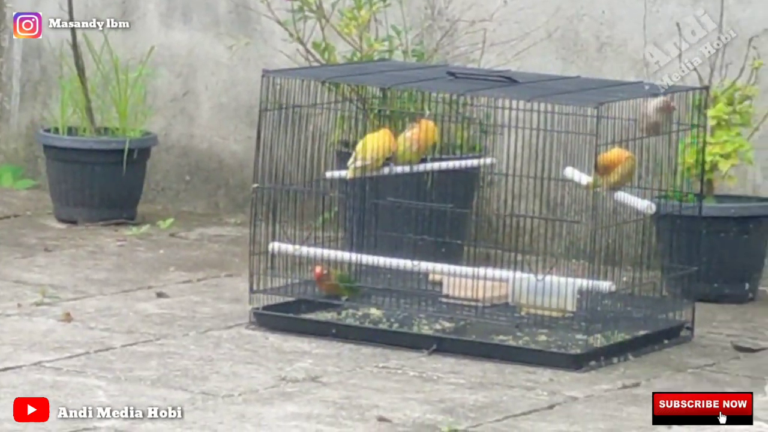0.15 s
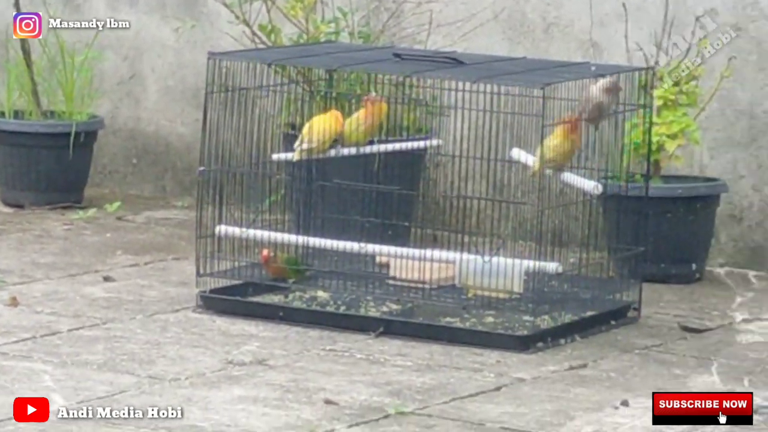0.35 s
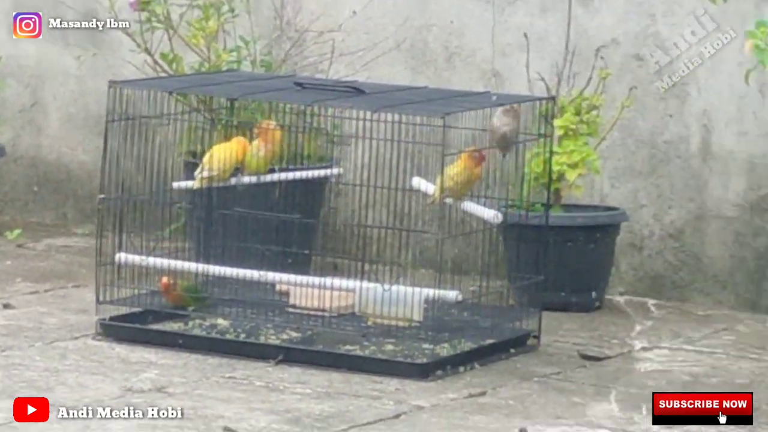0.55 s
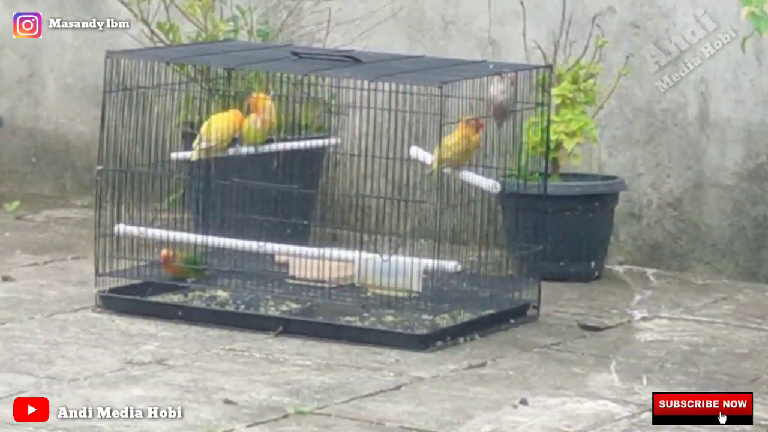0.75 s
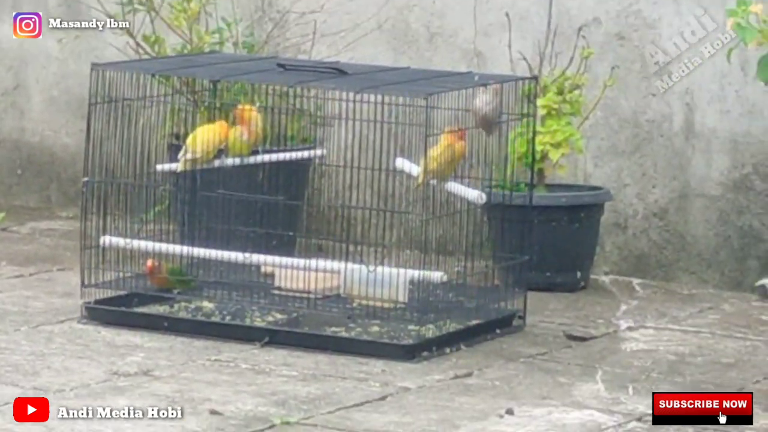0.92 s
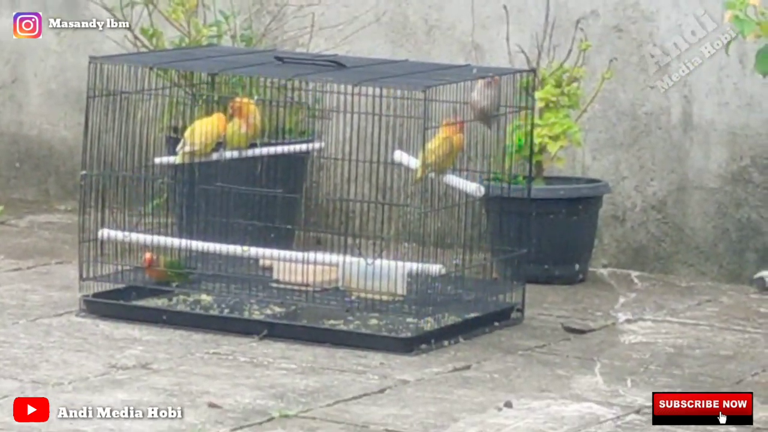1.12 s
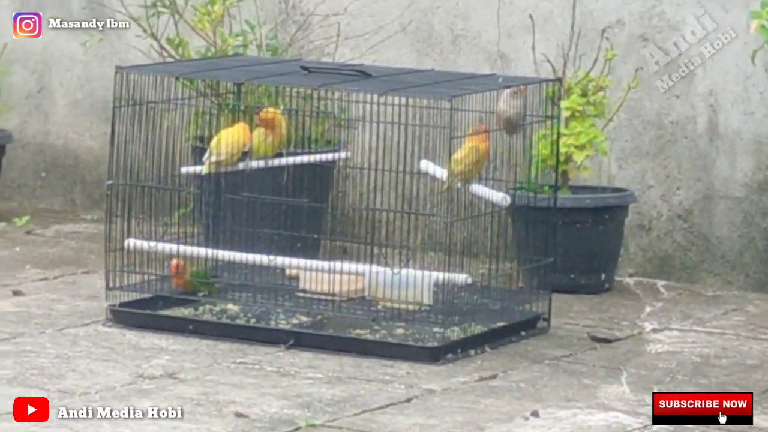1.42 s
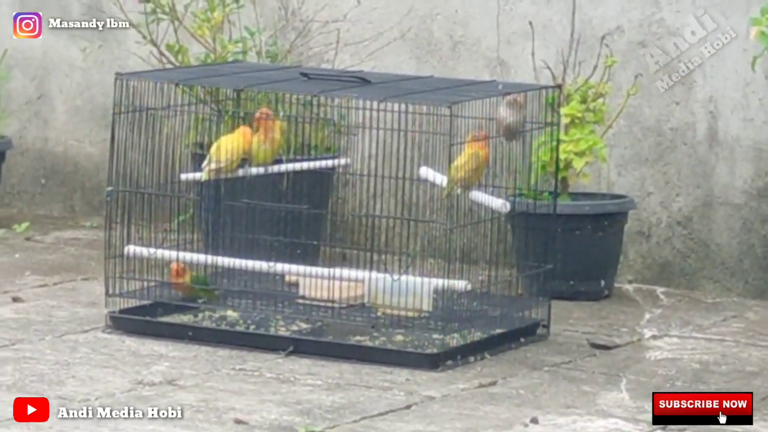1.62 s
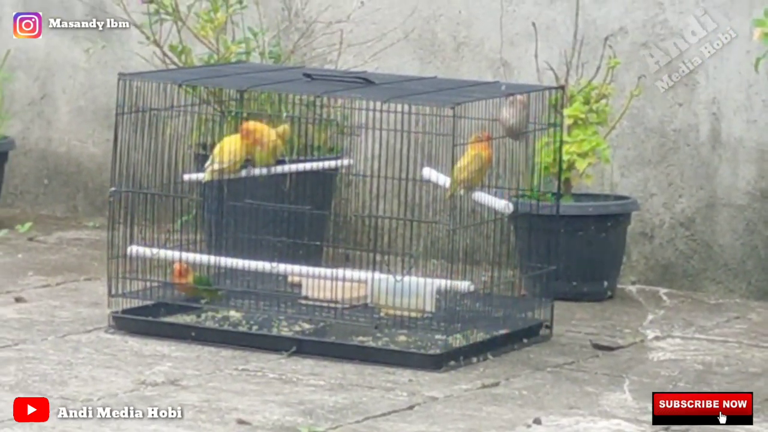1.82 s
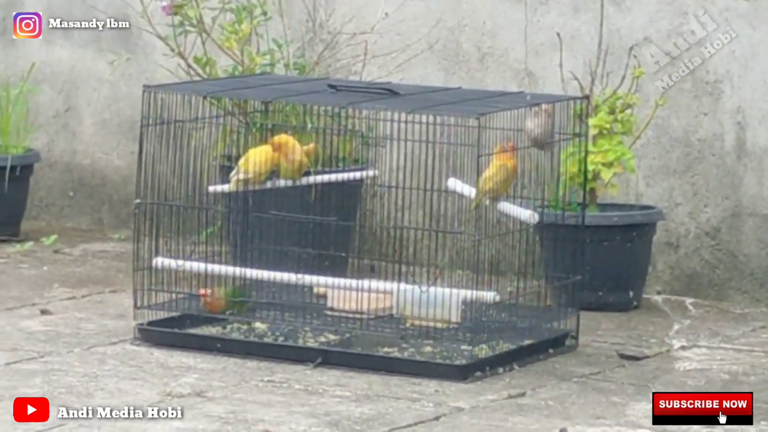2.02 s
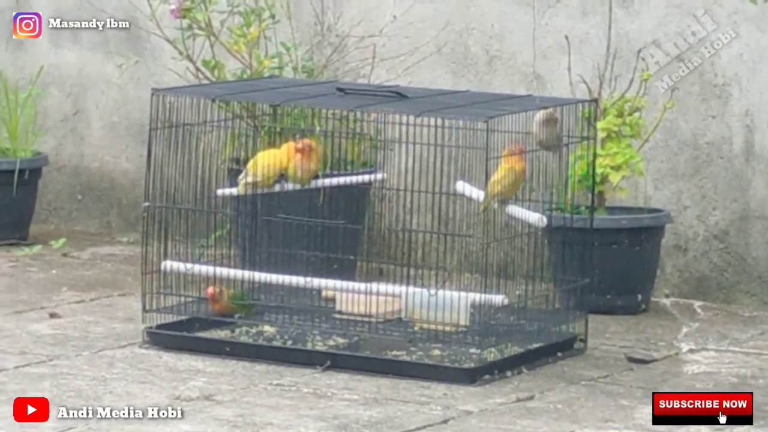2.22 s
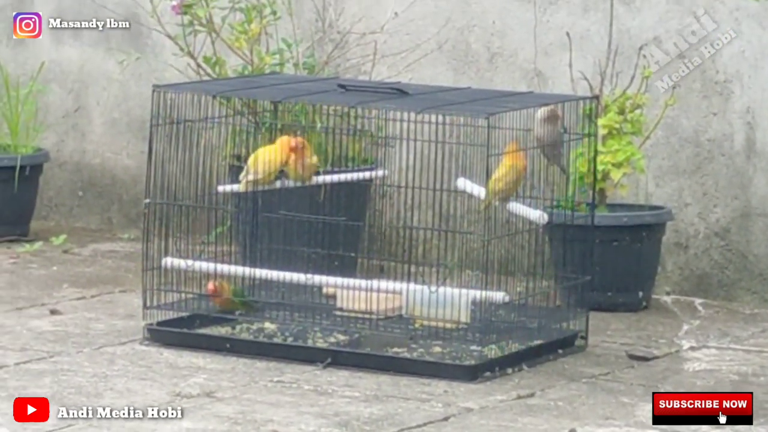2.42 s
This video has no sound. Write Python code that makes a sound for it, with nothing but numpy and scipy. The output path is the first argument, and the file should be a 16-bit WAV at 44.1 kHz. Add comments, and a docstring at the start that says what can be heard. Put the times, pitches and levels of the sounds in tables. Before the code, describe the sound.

Quick, shrill small-parrot twitter with short gliding notes, hollow plastic knocks early on, small ticks near the end, faint low outdoor rumble beneath, and hard yard walls adding short echoes around the microphone a few steps away.

```python
"""A walled, paved yard outdoors, with lovebirds twittering in a wire cage.
Runs of very short gliding calls, some pure, some raspy, are harmonics of one moving pitch plus pulsed hiss.
A hollow plastic perch rattles in decaying tube modes; beak and claw ticks are noise snaps with short rings.
Two faint whistles fall farther off. Delayed copies and decaying noise make the yard's echoes and ring.
Beneath lie a faint shaped-noise rumble, a wavering hum, a far drone and the tail of an earlier call."""
import sys
import numpy as np
from scipy import signal
from scipy.fft import rfft, irfft
from scipy.io import wavfile
from scipy.ndimage import map_coordinates

SR = 44100
rng = np.random.default_rng(int(sys.argv[2]) if len(sys.argv) > 2 else 0)


def master_out(mix):
    """Clip the mix to full scale and print it as 16-bit PCM to the path in sys.argv[1]."""
    frames = np.transpose(np.atleast_2d(mix))
    ceiling = np.clip(frames, -1, 1)
    pcm = np.round(ceiling * 32767).astype(np.int16)
    wavfile.write(sys.argv[1], SR, pcm)


N = 112454  # samples, about 2.55 s


def undb(db):
    """Decibels to amplitude gain."""
    return 10 ** (np.asarray(db) / 20)


def unit(x):
    """Scale to rms 1."""
    return x / np.sqrt(np.mean(x ** 2) + 1e-20)


def noise(points, size):
    """Noise of rms 1, its spectrum drawn through (hz, db) points on a log frequency axis."""
    hz, db = np.array(points, float).T
    f = np.maximum(np.arange(size // 2 + 1) * SR / size, 1)
    gain = undb(np.interp(np.log(f), np.log(hz), db))
    return unit(irfft(rfft(rng.standard_normal(size)) * gain, size))


def wobble(hz, size):
    """Smooth random motion: a curve through hz random points a second."""
    at = np.arange(size) * hz / SR
    return map_coordinates(rng.standard_normal(512), [at], order=2, mode="wrap")


def add(out, start, x):
    """Mix x into out at a time in seconds."""
    i = max(int(start * SR), 0)
    out[i:i + len(x)] += x[:max(len(out) - i, 0)]


def fade(t, t60):
    """Exponential decay that falls 60 dB in t60 seconds."""
    return np.exp(-np.log(1000) * t / t60)


def outdoor_air():
    """Faint outdoor rumble: shaped noise whose level wanders slowly."""
    # spectrum of the open air: hz, relative_db
    air_colour = [(20, -10.5), (65, 1.5), (115, -4.5), (200, -2), (290, -20), (1000, -17), (3000, -22),
                  (16000, -41)]
    level_db = -51 + wobble(4, N)
    return undb(level_db) * noise(air_colour, N)


def low_hum(t):
    """Steady 64 Hz sine with a wavering level."""
    level_db = -56 + 2.5 * wobble(5.43, N)
    return undb(level_db) * np.sqrt(2) * np.sin(2 * np.pi * 64 * t)


def far_drone(t):
    """Distant drone: noise gathered in low bands, fading and then returning."""
    # bands of the drone: hz, relative_db
    drone_colour = [(110, -3), (172, 0), (250, -11.5), (370, -4.5), (520, -33)]
    # its fall and return: time_s, level_db
    drone_level = [(0, -48.5), (.9, -56), (1.7, -57.5), (2.1, -62.5), (2.5, -53)]
    level_db = np.interp(t, *np.array(drone_level).T)
    return undb(level_db) * noise(drone_colour + [(2000, -76)], N)


def earlier_call(t):
    """Ring left by an earlier call: noise in the call's bands, dying away from the start."""
    # spectrum of that ring: hz, relative_db
    call_colour = [(1180, -37), (3320, -13), (4130, -2), (5190, -5.5), (5410, -38), (8240, -23),
                   (15000, -28)]
    return undb(-36) * noise(call_colour, N) * fade(t, 0.52)


def soft_bump(t):
    """One soft low bump: a narrow band of noise under a bell-shaped swell."""
    # the bump: centre_s, width_s, centre_hz, level_db
    when, width, hz, db = (2.54, .025, 270, -47)
    swell = np.exp(-((t - when) / width) ** 2)
    band = [(hz / 4, -25), (hz, 0), (hz * 2, -25), (hz * 10, -60)]
    return undb(db) * swell * noise(band, N)


def background():
    """Everything that lies behind the birds and the cage, summed without added echo."""
    t = np.arange(N) / SR
    return outdoor_air() + low_hum(t) + far_drone(t) + earlier_call(t) + soft_bump(t)


def yard(x):
    """Direct sound, echoes off paving and walls, quick scatter and a longer coloured ring."""
    # reflections from nearby surfaces: delay_s, level_db
    echo_paths = [(0.0109, -31), (0.0268, -14.5)]
    # colour of the yard's ring: hz, relative_db
    ring_colour = [(200, -19.5), (1500, -2), (3000, 3.5), (4800, -4.5), (6500, -4.5), (10000, -4.5),
                   (16000, -7.5)]
    scatter_db, scatter_t60 = -4, 0.19  # dB re direct energy, s
    ring_db, ring_t60 = -12.5206, 0.55
    t = np.arange(32768) / SR
    # both tails build up over a few milliseconds before they decay
    scatter = rng.standard_normal(len(t)) * fade(t, scatter_t60) * np.clip(t / 0.0087, 0, 1)
    ring = noise(ring_colour, len(t)) * fade(t, ring_t60) * np.clip(t / 0.024, 0, 1)
    response = undb(scatter_db) * scatter / np.linalg.norm(scatter)
    response += undb(ring_db) * ring / np.linalg.norm(ring)
    response[0] += 1  # direct sound
    for delay, db in echo_paths:
        add(response, delay, undb([db]))
    return signal.fftconvolve(x, response)[:N]


def far_bird():
    """Thin falling whistles farther off: sines that swell and fade."""
    # the whistles: start_s, length_s, start_hz, end_hz, level_db (the crest is 6 dB higher)
    whistles = [(2.296, 0.064, 3240, 2930, -58), (2.483, 0.0276, 3110, 2820, -54.5)]
    out = np.zeros(N)
    for start, length, first, last, db in whistles:
        size = int(length * SR)
        phase = 2 * np.pi * np.cumsum(np.linspace(first, last, size)) / SR
        add(out, start, 2 * undb(db) * np.hanning(size) * np.sin(phase))
    return out


def perch():
    """Each knock rings the hollow tube's modes; the place of the knock sets their weights."""
    # knocks as a bird shifts: start_s, level_db before trim_db
    knocks = [(.017, -24.5), (.045, -26), (0.063, -34.5), (0.092, -27), (0.219, -26), (0.27, -32),
              (0.301, -26.5), (0.331, -28), (0.359, -23.5), (0.397, -28.5), (0.451, -28), (0.468, -30),
              (1.630, -32), (1.651, -33.5), (1.985, -35)]
    # tube modes 1, 2, 3: hz before the pitch factor, relative_db, t60_s
    tube_modes = [(628, -4.5, 0.033), (1105, -9, 0.024), (1565, -11, 0.023)]
    # where the perch is knocked: time_s, place along the tube 0-1, pitch_factor
    grip = [(0.108, 0.304, 0.87), (0.215, 0.358, 0.85), (0.3, 0.498, 0.93)]
    trim_db, crack_db = -0.5, -11  # crack relative to the ring
    crack_colour = [(100, 8.5), (400, 12), (1400, -10.5), (3000, -41)]  # hz, relative_db
    out, t = np.zeros(N), np.arange(4096) / SR
    times, places, factors = np.array(grip).T
    for start, db in knocks:
        place = np.interp(start, times, places)
        factor = np.interp(start, times, factors)
        ring = 0
        for k, (hz, mode_db, t60) in enumerate(tube_modes, 1):
            hz = hz * factor * (1 + 0.015 * rng.standard_normal())
            weight = np.sin(k * np.pi * place) * undb(mode_db)
            ring = ring + weight * fade(t, t60) * np.sin(2 * np.pi * hz * t)
        crack = noise(crack_colour, len(t)) * fade(t, 0.033)
        add(out, start, undb(db + trim_db) * (ring + undb(crack_db) * crack))
    return out


def ticks():
    """Small ticks on the cage, as of beak or claw: a bright snap and a very short ring of two modes."""
    # the ticks: start_s, level_db before trim_db, ring_hz, snap_db relative to the ring
    cage_ticks = [(2.197, -35, 1240, -16), (2.365, -36.5, 1290, 2), (2.3757, -26.5, 1794, 0.5),
                  (2.407, -30, 1136, -1.5), (2.429, -39, 1246, -4)]
    trim_db, ring_t60, snap_t60 = 0.5, 0.017, 0.02  # dB, s, s
    snap_colour = [(200, -8.5), (1500, 8.5), (4000, -7.0), (15000, -5.5)]  # hz, relative_db
    out, t = np.zeros(N), np.arange(4096) / SR
    for start, db, hz, snap_db in cage_ticks:
        modes = np.sin(2 * np.pi * hz * t) + np.sin(2 * np.pi * hz * 1.5 * t) / 2
        ring = modes * fade(t, ring_t60)
        snap = noise(snap_colour, len(t)) * fade(t, snap_t60)
        add(out, start, undb(db + trim_db) * (ring + undb(snap_db) * snap))
    return out


def note(length, pitches, levels, rough):
    """One syrinx note: an arched glide with harmonics; roughness shakes pitch, chops level and adds hiss."""
    # colour of the hiss in rough notes: hz, relative_db
    rasp_colour = [(1500, -26.5), (2100, -21), (3000, 11), (4500, 3.5), (6300, 2), (7500, 12.5), (10000, 4),
                   (13000, 4), (16000, -18.5)]
    attack, release = 0.0021, 0.0026  # s
    jitter_hz, jitter, shimmer = 613.5, 0.066, 0.49  # random points a second; shares at full roughness
    trill_hz, trill_depth, flutter = 253.4, 0.07, 0.73  # rate varies by note; shares as above
    overtone_fall_db = -9  # per harmonic above the fourth
    rasp_db, rasp_arch = -4.5, 0.84  # arch: share of the hiss that swells toward mid-note
    swell_db = 2.5  # growth from start to end
    size = 4096
    t = np.arange(size) / SR - attack / 2
    along = np.clip(t / length, 0, 1)  # progress through the note

    hz = np.polyval(np.polyfit([0, .5, 1], pitches, 2), along)
    trill = np.sin(2 * np.pi * (trill_hz * t * rng.uniform(0.88, 1.175) + rng.random()))
    hz = hz * (1 + rough * (jitter * wobble(jitter_hz, size) + trill_depth * trill))
    phase = 2 * np.pi * np.cumsum(hz) / SR

    gains = undb(np.r_[levels, levels[-1] + overtone_fall_db * np.arange(1, 4)])
    tone = 0
    for k, gain in enumerate(gains, 1):
        below_limit = k * hz < SR / 2
        tone = tone + gain * np.sqrt(2) * np.sin(k * phase) * below_limit
    tone = tone * (1 + shimmer * rough * wobble(jitter_hz, size))

    # the hiss comes in one puff per cycle of the pitch
    hiss = noise(rasp_colour, size) * (1 + np.cos(phase))
    hiss = hiss * rough * undb(rasp_db) * np.linalg.norm(gains)
    hiss = hiss * (1 - rasp_arch + rasp_arch * np.sin(np.pi * along))

    env = np.clip(t / attack + .5, 0, 1) * np.clip((length - t) / release + .5, 0, 1)
    env = env * undb(swell_db * (along - .5))
    env = env * (1 + flutter * rough * trill)
    return env * (tone + hiss)


def lovebirds():
    """The twitter, high-passed to keep the quick note onsets free of low clicks."""
    # the notes of the twitter, and at 1.591 s a high echo of the call before it:
    # start_s, length_s, start_hz, middle_hz, end_hz,
    # harmonic_1_db to harmonic_4_db before voice_db, roughness (held to 0-1)
    twitter = [ (.184, 0.016, 3380, 3293, 3600, -28, -28, -46.5, -43.5, 0.14),
               (.199, .008, 3570, 4580, 5500, -21, -34, -32, -60.5, 0.1),
               (0.206, 0.0083, 6030, 5680, 4400, -20, -42, -58, -61, 0.06),
               (0.212, .024, 3485, 3320, 3265, -26, -23, -36.5, -27.5, 0.41),
               (.239, 0.046, 3266, 3110, 3043, -28, -24.5, -35, -31.5, 0.11),
               (0.293, 0.0054, 5890, 4550, 4200, -20, -31, -36, -62, 0.7),
               (0.296, .011, 4420, 4467, 4600, -19, -36, -28.5, -62, 0.42),
               (0.307, .024, 4686, 4780, 4630, -32, -41.5, -37, -62, 0.81),
               (0.331, 0.013, 4374, 4360, 4420, -17, -34, -31, -57, 0.11),
               (.542, .026, 6950, 4940, 5100, -33, -45, -34.5, -64, 0.29),
               (.614, 0.018, 1910, 2213, 2120, -43, -40, -55, -65, 0.76),
               (0.679, 0.028, 1562, 1976, 2100, -45, -35, -62, -56, 0.44),
               (0.709, .013, 3130, 2896, 3200, -30, -44, -56, -42.5, 0.05),
               (0.706, 0.018, 4130, 4135, 4140, -30.5, -39, -43, -62, 0.46),
               (0.726, 0.016, 5170, 6380, 6010, -32.5, -34, -62, -62, 0.2),
               (0.736, 0.012, 5570, 5010, 5470, -28, -46, -45, -62, 0.29),
               (0.821, 0.016, 1700, 2120, 2280, -40.5, -50, -64, -56, 0.37),
               (.83, 0.044, 1672, 1992, 2055, -53, -30, -59, -40.5, 0.5),
               (0.867, 0.011, 3040, 3010, 3100, -27, -36, -56, -33.5, 0.19),
               (0.88, .018, 4610, 4870, 4780, -29.5, -55, -43, -62.5, 0.67),
               (0.928, 0.025, 2076, 2454, 2330, -33, -35.5, -42, -50, 0.15),
               (.949, 0.017, 2230, 2072, 2220, -33.5, -23.5, -47, -34, 0.09),
               (.967, 0.0086, 2960, 3400, 3370, -20, -42.5, -46, -36, 0.63),
               (0.974, .034, 3086, 2965, 2930, -28, -29.5, -47.5, -25.5, .12),
               (1.014, 0.017, 3060, 2940, 2730, -45, -26.5, -46.5, -29.5, 0.33),
               (1.031, 0.022, 2960, 2917, 2760, -33.5, -39.5, -49.5, -34.5, 0.22),
               (1.024, .032, 5310, 5220, 4990, -29.5, -53.5, -58, -62.5, 0.3),
               (1.059, 0.0046, 3900, 4520, 4900, -27, -54, -46.5, -65, 0.43),
               (1.068, 0.012, 2330, 2303, 2480, -28, -38.5, -42, -58, 0.3),
               (1.075, 0.027, 3640, 3507, 3633, -14.5, -44.5, -38, -46, 0.02),
               (1.099, 0.011, 3680, 3844, 3770, -17.5, -37.5, -28, -39, 0.14),
               (1.116, 0.016, 4300, 4447, 4510, -18, -48.5, -41, -65, 0.39),
               (1.139, 0.0056, 4436, 5530, 7000, -21, -41.5, -60.5, -63.5, 0.77),
               (1.145, 0.0188, 6650, 6600, 6330, -26.5, -34.5, -62.5, -62.5, 1.05),
               (1.134, 0.054, 3120, 2848, 2537, -30, -40, -40, -37, .6),
               (1.162, 0.037, 4870, 4366, 5314, -15.5, -33, -28, -62, 0.15),
               (1.204, 0.029, 5000, 6360, 5630, -20.5, -33, -61, -60, 0.33),
               (1.191, .052, 2245, 2140, 2138, -34.5, -44, -40.5, -35.5, 0.39),
               (1.23, 0.017, 3100, 3183, 3100, -26.5, -42, -39, -44, 0.74),
               (1.25, 0.0088, 3520, 4385, 5700, -18.5, -27, -51, -65, 0.43),
               (1.259, .011, 3056, 3300, 3600, -25, -49, -36, -47, 0.52),
               (1.27, 0.018, 4765, 3655, 2930, -23, -41, -36.5, -57.5, 0.3),
               (1.293, 0.0064, 3250, 4100, 5140, -21, -26.5, -44.5, -60, 0.71),
               (1.318, .031, 5030, 5740, 6330, -27.5, -31, -62, -61, 0.24),
               (1.398, 0.0088, 1760, 2040, 2770, -36, -48, -52, -62, 0.05),
               (1.413, 0.022, 3570, 3415, 3080, -26.5, -39, -38, -58, 0.26),
               (1.432, 0.01, 3606, 3650, 3880, -21, -32, -33, -58.5, .35),
               (1.444, 0.0068, 2410, 2230, 2280, -30, -22, -37.5, -33, 0.52),
               (1.447, .012, 5250, 5490, 5850, -24, -28.5, -61.5, -64, 0.33),
               (1.565, 0.021, 5680, 6000, 6464, -15, -35, -62, -61, 0.18),
               (1.591, 0.016, 6150, 6400, 6470, -35.5, -27.5, -62, -62.5, 0.03),
               (1.649, 0.02, 2350, 2507, 2270, -28, -33.5, -41.5, -43, 0.15),
               (1.665, 0.022, 3680, 3620, 3380, -25, -39.5, -47, -53, .35),
               (1.696, 0.026, 4080, 4430, 4640, -21, -40, -39.5, -61.5, 0.6),
               (1.724, 0.0091, 4580, 5020, 4830, -13, -32, -50, -62, 0.1),
               (1.725, 0.023, 3040, 2940, 3040, -25.5, -36.5, -35, -36.5, 0.2),
               (1.738, 0.0066, 5000, 4260, 3520, -21.5, -34, -44, -58, 0.4),
               (1.808, 0.015, 2800, 3760, 4100, -32, -54, -51, -59.5, 0.36),
               (1.819, .007, 2190, 1870, 2000, -30, -30.5, -53.5, -41, 0),
               (1.83, 0.034, 4154, 3780, 3625, -24.5, -34.5, -51, -41, 0.7),
               (1.846, .024, 6290, 5470, 4870, -22, -36.5, -58, -62, 0.33),
               (1.869, .004, 4220, 5000, 5600, -20, -31, -40, -60, 0.58),
               (1.874, 0.014, 2830, 2580, 2550, -32, -30.5, -37.5, -32, 0.23),
               (1.887, 0.0076, 4330, 4590, 4900, -15.5, -29, -27.5, -61.5, 0.42)]
    voice_db, low_cut_hz = 0.5, 1880
    out = np.zeros(N)
    for start, length, first, middle, last, *levels, rough in twitter:
        one = note(length, [first, middle, last], np.array(levels), np.clip(rough, 0, 1))
        add(out, start, one)
    low_cut = signal.butter(5, low_cut_hz, "high", fs=SR, output="sos")
    return signal.sosfilt(low_cut, out) * undb(voice_db)


def scene():
    """Birds and cage in the yard; the small knocks stir less of its ring."""
    knocks = perch() + ticks()
    wet = 0.62  # share of the knocks that excites the yard
    in_yard = yard(lovebirds() + far_bird() + wet * knocks)
    return (in_yard + (1 - wet) * knocks + background())[None]


def record(dry):
    """The recorder cuts the top: a steep low-pass at 15.7 kHz."""
    top_cut = signal.ellip(10, .2, 70, 15700, fs=SR, output="sos")
    return signal.sosfilt(top_cut, dry)


dry = scene()
out = record(dry)
master_out(out)
```